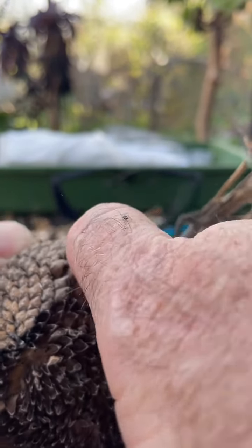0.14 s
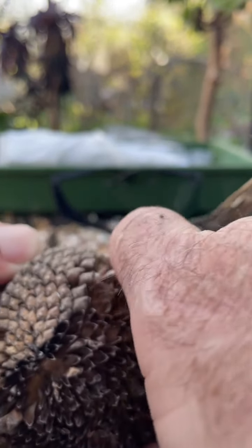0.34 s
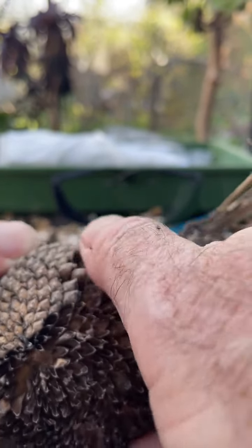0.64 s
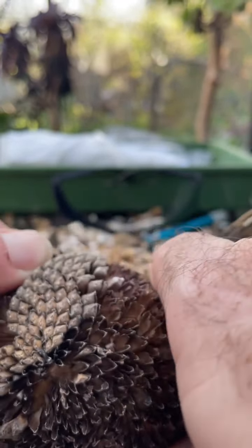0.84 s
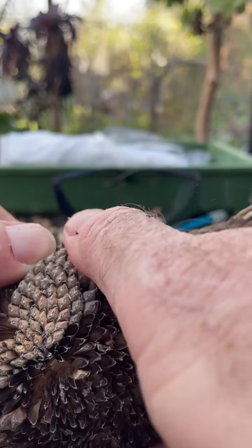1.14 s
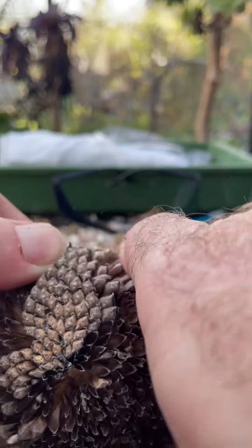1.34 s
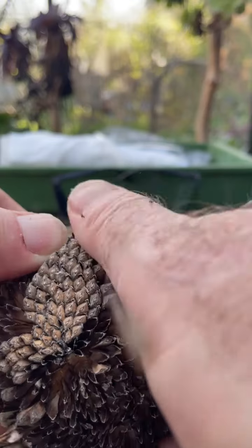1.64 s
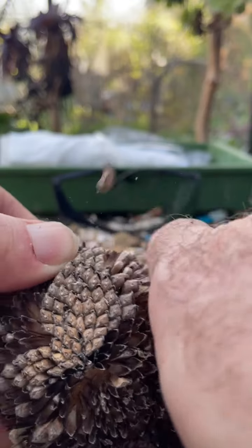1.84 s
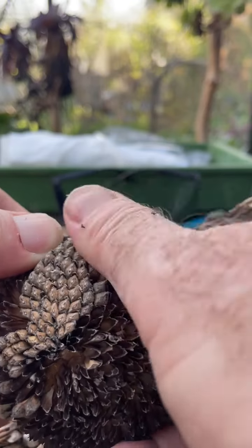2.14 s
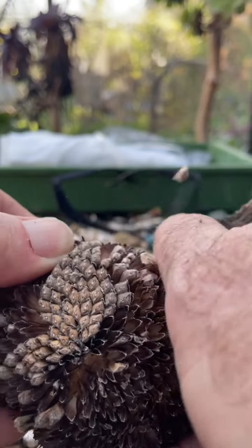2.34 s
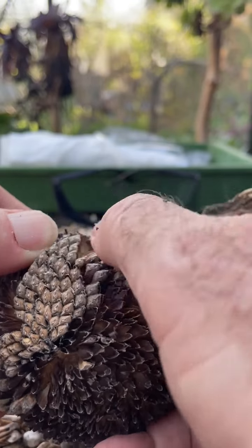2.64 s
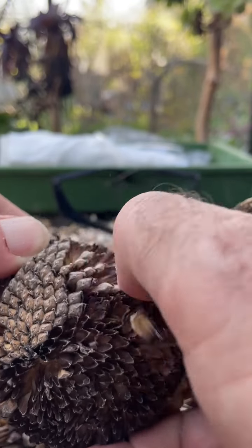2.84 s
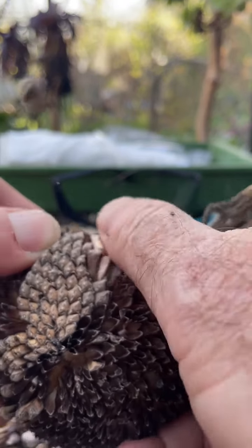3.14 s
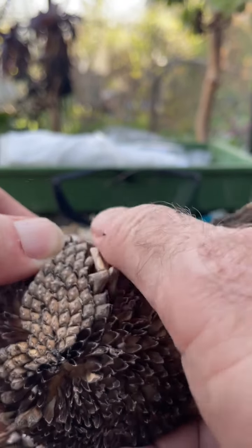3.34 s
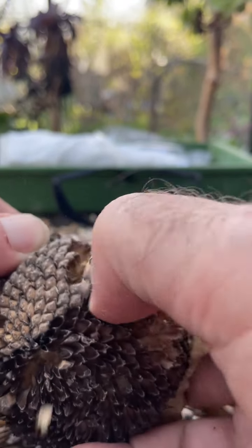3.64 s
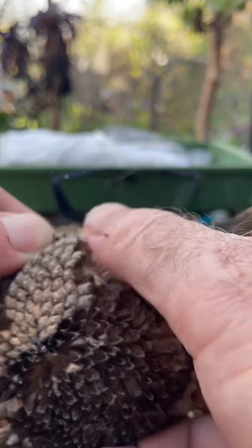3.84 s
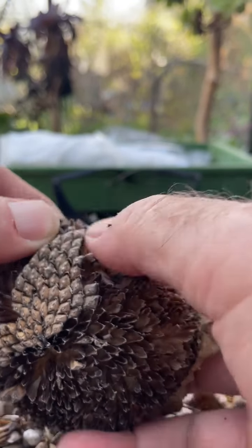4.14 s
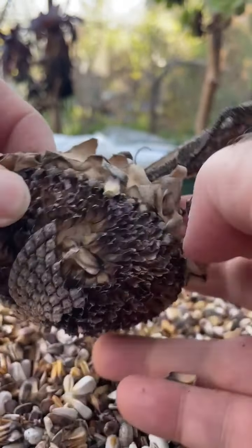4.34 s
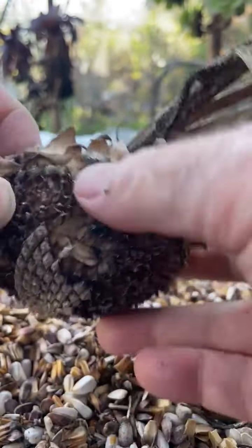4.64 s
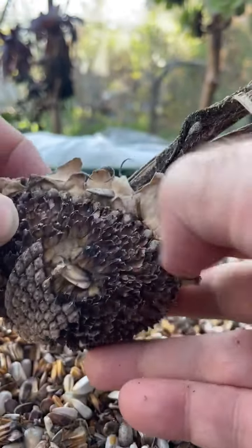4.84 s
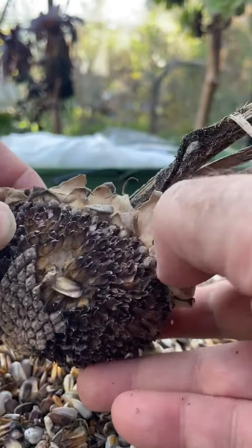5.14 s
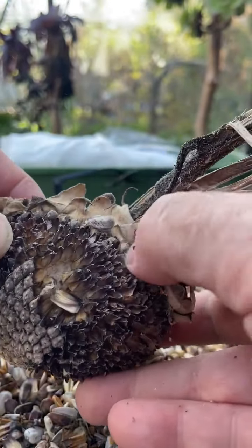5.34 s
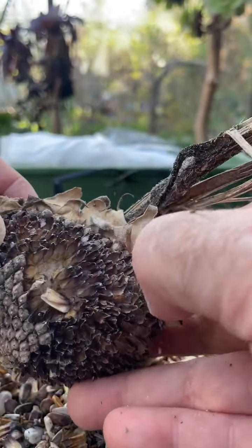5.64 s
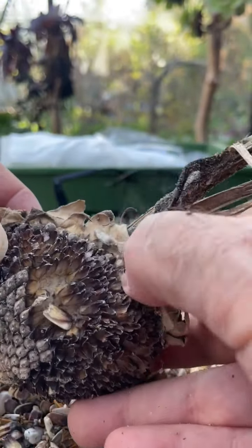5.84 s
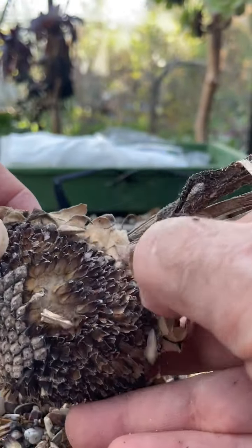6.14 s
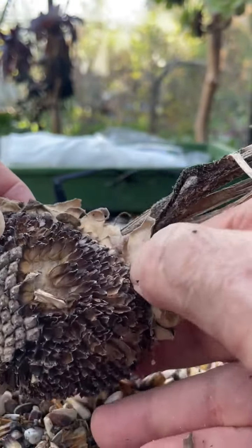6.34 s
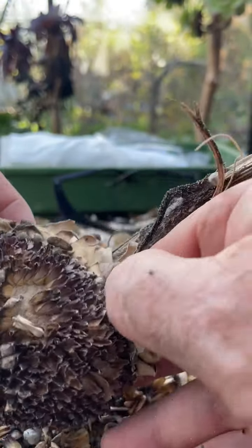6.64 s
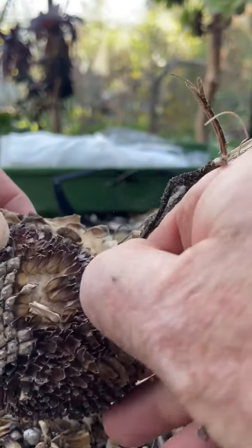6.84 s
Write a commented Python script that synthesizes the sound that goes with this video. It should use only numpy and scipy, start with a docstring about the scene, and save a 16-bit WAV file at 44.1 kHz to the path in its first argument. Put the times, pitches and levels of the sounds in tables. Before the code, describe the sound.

Dry husks crackle, creak and tick under short thumb pushes, with brief lulls between. Early strokes are light; later ones bring hard bright snaps and low thumps as the head knocks in the hand. Heard a hand's width away in stereo, dry and without echo, in a garden with faint low traffic and barely audible wavering hums.

```python
"""Seeds rubbed out of a dry flower head

A thumb rubs dry seeds out of a flower head, a hand's width from a phone in a garden.
Every push is a swarm of tiny fractures that ring the head, the husks and the chaff as damped modes.
Short noise bursts make the snaps and one squeak; the head knocks in the hand as falling sine thumps.
Behind, far traffic rumbles as filtered noise and faint wavering sine hums come and go."""
import sys
import numpy as np
from scipy import signal
from scipy.fft import rfft, irfft, next_fast_len
from scipy.io import wavfile
from scipy.ndimage import uniform_filter1d

SR = 44100
rng = np.random.default_rng(int(sys.argv[2]) if len(sys.argv) > 2 else 0)


def generate_wav(signal):
    """Clip the signal to [-1, 1] and save it as 16-bit WAV at the path in sys.argv[1]."""
    frames = np.transpose(np.atleast_2d(signal))
    scaled = np.clip(frames, -1, 1) * 32767
    pcm = np.round(scaled).astype(np.int16)
    wavfile.write(sys.argv[1], SR, pcm)


N = 308259
PORT_SIGN = np.array([[1], [-1]])  # left, right


def undb(db):
    """Gain of a dB value."""
    return 10 ** (np.asarray(db) / 20)


def unit(x):
    """Scale to rms 1."""
    return x / np.sqrt(np.mean(x ** 2))


def walk(rate_hz):
    """Random levels, one per 1 / rate_hz, joined by ramps; rms 1."""
    hold = int(SR / rate_hz)
    steps = np.repeat(rng.standard_normal(N // hold + 1), hold)
    return unit(uniform_filter1d(steps, hold)[:N])


def ring(x, hz, width_hz):
    """One damped mode, gain 1 at its centre."""
    return signal.lfilter(*signal.iirpeak(hz, hz / width_hz, fs=SR), x)


def ring_twice(x, hz, width_hz):
    """A mode with steeper skirts: a second resonance, twice as wide, follows the first."""
    return ring(ring(x, hz, width_hz), hz, 2 * width_hz)


def colour(x, response):
    """Filter by a function of frequency."""
    size = next_fast_len(N)
    hz = np.arange(size // 2 + 1) * SR / size + 1  # 1 Hz up keeps its log finite
    return irfft(rfft(x, size) * response(hz), size)[..., :N]


def pressure():
    """Husk, head and chaff levels in dB: every push swells, holds and lets go over a quiet rest."""
    # thumb pushes: (full pressure from [s], hold [s], swell [s], release [s],
    #                husk crackle [dB], head creak [dB], chaff rustle [dB])
    strokes = [(0.001, 0.074, 0.074, 0.1, -56.5, -60.5, -56.5), (0.181, 0.038, 0.009, 0.067, -43, -40, -46),
               (0.384, 0.075, 0.1, 0.17, -50, -59, -53.5), (0.676, 0.063, 0.13, 0.032, -43.5, -46.5, -48.5),
               (0.807, 0.056, 0.043, 0.053, -37, -45, -44.5),
               (1.035, 0.096, 0.087, 0.12, -56.5, -59.5, -68), (1.253, 0.047, 0.067, 0.084, -43, -40, -47),
               (1.431, 0.063, 0.09, 0.018, -44, -46, -48), (1.558, 0.008, 0.063, 0.037, -38, -53.5, -42),
               (1.703, 0.012, 0.1, 0.066, -43.5, -45, -50), (1.817, 0.014, 0.055, 0.071, -36.5, -39, -39.5),
               (1.869, 0.18, 0.046, 0.016, -49, -57.5, -57.5), (2.291, 0.021, 0.21, 0.024, -38, -42.5, -41),
               (2.361, 0.034, 0.031, 0.13, -39.5, -51, -45.5), (2.688, 0.025, 0.15, 0.23, -41, -47, -41.5),
               (2.902, 0.038, 0.15, 0.052, -37, -49, -46), (3.027, 0.086, 0.014, 0.15, -43.5, -47, -46.5),
               (3.086, 0.082, 0.023, 0.17, -43.5, -43.5, -46),
               (3.311, 0.014, 0.046, 0.076, -38, -46, -43.5),
               (3.397, 0.027, 0.027, 0.05, -34.5, -39.5, -40),
               (3.496, 0.045, 0.15, 0.031, -40.5, -42.5, -48), (3.61, 0.026, 0.082, 0.018, -37, -50.5, -42),
               (3.674, 0.022, 0.02, 0.13, -40.5, -49, -44), (3.801, 0.016, 0.01, 0.11, -32, -44.5, -39.5),
               (3.883, 0.03, 0.057, 0.022, -37.5, -49.5, -47), (4.049, 0.022, 0.15, 0.052, -58, -65, -62.5),
               (4.16, 0.1, 0.039, 0.02, -38, -42, -42.5), (4.312, 0.019, 0.13, 0.19, -37, -48, -42.5),
               (4.557, 0.017, 0.011, 0.21, -47.5, -57, -55),
               (4.723, 0.031, 0.14, 0.095, -35.5, -44.5, -40.5),
               (5.023, 0.049, 0.098, 0.026, -35, -44.5, -38.5),
               (5.121, 0.0073, 0.16, 0.21, -46.5, -53, -66), (5.357, 0.083, 0.16, 0.067, -44.5, -53.5, -45),
               (5.522, 0.016, 0.015, 0.09, -34.5, -39, -46), (5.653, 0.026, 0.035, 0.1, -49.5, -65, -61),
               (5.816, 0.042, 0.089, 0.1, -51, -51, -49), (5.885, 0.0076, 0.017, 0.051, -34.5, -44.5, -31),
               (6.015, 0.011, 0.031, 0.033, -37, -37.5, -44), (6.06, 0.0087, 0.069, 0.034, -33.5, -45, -45),
               (6.143, 0.092, 0.1, 0.15, -41, -46, -47.5), (6.483, 0.06, 0.2, 0.031, -46, -49.5, -50),
               (6.591, 0.025, 0.012, 0.15, -44, -46.5, -47), (6.688, 0.094, 0.048, 0.037, -54, -57, -52),
               (6.938, 0.0081, 0.16, 0.099, -47, -50.5, -56)]
    # while the hands only hold the head: (husk [dB], head [dB], chaff [dB])
    rest_levels = (-62.5, -65, -82)
    swell_db = 20  # rise over the swell time, fall over the release time
    t = np.arange(0, N + 64, 64) / SR
    start, hold, swell, release, *levels = np.transpose(strokes)[..., None]
    before = (start - t) / swell
    after = (t - start - hold) / release
    shape_db = -swell_db * np.maximum(np.maximum(before, after), 0)
    tracks = []
    for db, rest_db in zip(levels, rest_levels):
        power = np.sum(undb(db + shape_db) ** 2, axis=0) + undb(rest_db) ** 2
        tracks.append(np.interp(np.arange(N) / SR, t, 10 * np.log10(power)))
    return tracks


def fractures(effort_db, spread_db=1.5, patchy_db=1.5, pan_db=10, count=11000, busy_db=-43.5, sparse=.15):
    """Places and port gains of tiny fractures: flurries under a firm thumb, lone ticks under a light one."""
    tick_share, tick_db = .09, 11  # the few that stand out as dry ticks
    place, rank, pan, keep, tick = rng.random((count, 5)).T
    at = (place * (N - 1)).astype(int)
    share = np.clip(undb(effort_db[at] - busy_db), sparse, 1)
    kept = (keep < share) / np.sqrt(share)  # fewer but larger
    patches = (walk(22) + walk(60))[at]
    size = kept * undb(-spread_db * np.log(1 - .97 * rank) + patchy_db * patches)
    size *= rng.standard_normal(count) + np.where(tick < tick_share, undb(tick_db), 0)
    side_db = pan_db * (2 * pan - 1)
    return at, size * undb(PORT_SIGN * side_db / 2)


def rubbing(modes, level_db, at, size, tone_hz=None, colour_db=3.5, scatter=.45, smear=.5, shift_db=2.5):
    """Fractures drive each mode by varied amounts; steady noise fills the gaps; the grip shifts the colour."""
    focus_db = 7  # fall per octave away from tone_hz
    lean = np.ones((len(modes), 1))
    if tone_hz is not None:
        lean = undb(-focus_db * np.abs(np.log2(np.array(modes)[:, :1] / tone_hz)))
        lean = lean / np.sqrt(np.mean(lean ** 2, axis=0))
    out = 0
    for k, ((hz, width_hz, db), weight) in enumerate(zip(modes, lean)):
        push = (-1) ** k + scatter * rng.standard_normal((2, len(at)))
        push = push * undb(colour_db * rng.standard_normal(len(at)))
        pulses = np.zeros((2, N))
        for channel in range(2):
            np.add.at(pulses[channel], at, size[channel] * push[channel])
        shared, *own = rng.standard_normal((3, N))
        bed = shared + scatter * np.array(own)
        drive = unit(pulses) + smear * bed
        out = out + weight * undb(db + shift_db * walk(22)) * ring_twice(drive, hz, width_hz)
    return unit(out) * undb(level_db)


def snaps(modes, part, colour_db=1.5, tail_db=-22, tail_ms=6, scatter=.45, spiky_db=2.5):
    """A short noise burst with a rounded onset, with a weak noise tail after it, rings one part."""
    # short snaps, and one squeak near 970 Hz at 3.514 s:
    # (time [s], husk peak [dB], head peak [dB], chaff peak [dB], burst length [ms], pitch [Hz])
    bursts = [(0.0637, -31.5, -41.5, -37, 0.94, 5160), (0.1442, -32, -58, -37, 0.8, 3340),
              (0.196, -26.5, -33, -28, 3, 1260), (0.2192, -42, -30, -43, 1.0, 990),
              (0.236, -45, -28, -45.5, 2, 1020), (0.25, -50, -29.5, -48, 0.6, 1100),
              (0.2953, -34, -46, -51, 0.78, 4220), (0.3237, -32, -55, -37, 1.1, 6500),
              (0.421, -23.5, -54, -35, 0.52, 5840), (0.675, -27, -29, -26.5, 6.5, 855),
              (0.7289, -21, -33, -22, 1.7, 5940), (0.8182, -21.5, -27, -36, 1.9, 6000),
              (0.907, -27, -51, -36, 1.33, 2420), (0.9895, -35.5, -50, -38, 1.3, 6120),
              (1.0732, -34.5, -51.5, -33.5, 2.1, 3470), (1.1089, -35.5, -39, -36, 2.5, 730),
              (1.1875, -30, -42, -26.5, 0.74, 6780), (1.3096, -26, -37, -30, 2.3, 820),
              (1.3456, -23.5, -28.5, -28, 0.76, 2650), (1.419, -37, -27, -23, 0.89, 1740),
              (1.4489, -21.5, -25.5, -17.5, 1.2, 2750), (1.5696, -24.5, -39, -20, 1.2, 3550),
              (1.7081, -23.5, -27.5, -33, 1.6, 5970), (1.8219, -17.5, -30, -18, 0.77, 3320),
              (1.8459, -30, -25.5, -35, 1.5, 840), (1.9764, -25, -54, -37.5, 0.79, 2700),
              (2.0799, -32.5, -54.0, -30, 0.87, 3970), (2.2095, -28, -36, -19, 0.75, 2540),
              (2.2872, -21.5, -28, -19, 0.56, 780), (2.3791, -20, -34.5, -19.5, 1.33, 2780),
              (2.4823, -26, -37.5, -33.5, 1.5, 2730), (2.7364, -19.5, -37, -18, 1.7, 4100),
              (2.7606, -24, -52, -20, 0.74, 5830), (2.78, -16.5, -30, -29, 0.78, 3000),
              (2.8085, -26, -37, -16.5, 0.66, 6740), (2.9134, -18.5, -37, -27, 0.51, 5800),
              (2.9358, -17, -38, -27, 0.8, 2480), (3.0434, -18.5, -24.5, -8, 0.66, 740),
              (3.175, -23.5, -30.0, -22.5, 1, 830), (3.2055, -28, -46, -23, 0.75, 5710),
              (3.262, -7.5, -31, -32, 0.69, 3570), (3.393, -21, -26, -18, 1.52, 4100),
              (3.4217, -28, -31, -14.5, 0.48, 1840), (3.4462, -22, -47, -16.5, 1.35, 5940),
              (3.458, -19, -31, -9, 0.54, 6000), (3.467, -22.5, -27, -27, 0.6, 2500),
              (3.473, -36, -30, -40, 0.6, 590), (3.4917, -34, -28, -36, 0.6, 820),
              (3.5, -25, -35, -33, 0.8, 2600), (3.5075, -30, -41, -34, 0.6, 1200),
              (3.514, -44, -31, -50, 12, 970), (3.619, -17, -31.5, -23, 0.94, 2580),
              (3.6942, -17.5, -54, -25, 0.67, 6860), (3.784, -18.5, -32, -17, 1.5, 4390),
              (3.8, -10.5, -27.5, -15.5, 5, 4130), (3.8799, -16.5, -28, -24, 0.9, 4390),
              (3.9066, -23.5, -33, -21.5, 1.6, 3050), (4.0453, -31, -49, -39, 1.7, 2830),
              (4.0592, -29.5, -53, -39, 3, 2900), (4.13, -27.5, -35, -37, 0.63, 2700),
              (4.1525, -27, -52, -25, 1.6, 4200), (4.2, -26, -25.5, -21, 1.6, 1050),
              (4.253, -33, -27.5, -38, 1, 750), (4.3072, -26, -52, -20.5, 1.1, 4240),
              (4.33, -20, -30.5, -20, 0.7, 2880), (4.5148, -30.5, -57, -25, 1.2, 4630),
              (4.586, -28.5, -38.5, -50, 0.72, 3430), (4.718, -18.5, -40, -16, 4.3, 6000),
              (4.7352, -21.5, -49, -6.5, 0.51, 2480), (4.7628, -15.5, -25.5, -20, 1.4, 2950),
              (4.939, -26, -39, -27, 1.8, 6700), (4.99, -33, -53, -19, 1.7, 3700),
              (5.011, -23, -47, -5, 0.24, 4200), (5.069, -12.5, -20, -12.5, 1.55, 1360),
              (5.0866, -20, -33, -17, 0.83, 3120), (5.1306, -17, -32, -24, 0.55, 2750),
              (5.1365, -19, -22.5, -23, 2, 2870), (5.1897, -29.5, -50, -38, 1.2, 4100),
              (5.297, -31.0, -37, -39, 0.61, 2170), (5.331, -23, -38.5, -18.5, 1, 4140),
              (5.357, -23, -38, -20, 1.7, 4160), (5.3745, -22, -42, -13, 0.7, 5840),
              (5.4077, -16, -52, -13.5, 0.49, 6780), (5.4938, -28.5, -38, -31, 2.1, 3440),
              (5.5295, -9, -16.5, -9, 2, 4180), (5.549, -22, -41, -20, 1.3, 3560),
              (5.5681, -16, -19.5, -12.5, 0.85, 586), (5.6531, -13, -43, -20, 2.7, 5930),
              (5.8001, -30.5, -32, -46, 1.5, 4100), (5.8767, -17, -43, -17.5, 0.84, 6780),
              (5.8996, -17, -43, -11, 0.83, 6800), (5.986, -24, -48, -30, 0.96, 6800),
              (6.0102, -17, -29, -16, 0.68, 4890), (6.0171, -3.5, -16.5, -17.5, 2.6, 4930),
              (6.0576, -15.5, -39, -25, 1.2, 5040), (6.1443, -18.5, -44, -29, 0.81, 5070),
              (6.2012, -16, -30, -29, 1.7, 6700), (6.4301, -30, -39, -32.5, 0.77, 4220),
              (6.4773, -18.5, -23, -19, 1, 1410), (6.4964, -45, -26.5, -44, 0.6, 1570),
              (6.509, -40, -32, -38, 0.6, 1500), (6.5812, -40, -25, -44, 0.6, 1630),
              (6.5946, -26, -28, -32, 1.2, 5570), (6.6308, -30, -53, -27, 0.7, 5570),
              (6.804, -29.5, -54, -33, 1.4, 4950), (6.874, -29.5, -35, -24.5, 1.8, 830),
              (6.9123, -30, -50, -17, 0.58, 6050), (6.9196, -15.5, -17.5, -16, 3.1, 824)]
    focus_db = 5  # fall per octave away from the pitch of the burst
    own_db, own_q = 6, 5  # extra ring at that pitch: level, pitch over width
    head_top_hz = 2000  # lower bursts get it in the head, higher ones in the husks
    left_db = 1.8  # left over right
    ms = np.arange(1536) / SR * 1000
    mode_hz, _, mode_db = np.transpose(modes)
    out = np.zeros((2, N + len(ms)))
    for s, husk_db, head_db, chaff_db, length_ms, pitch_hz in bursts:
        peak_db = {"husk": husk_db, "head": head_db, "chaff": chaff_db}[part]
        grown = ms / (0.77 * max(length_ms, .3))
        pulse = (grown * np.exp(1 - grown)) ** 2
        tail = undb(tail_db) * (1 - np.exp(-grown)) * np.exp(-ms / tail_ms)
        spikes = undb(spiky_db * np.repeat(rng.standard_normal(64), len(ms) // 64))  # uneven level
        shared, *own = rng.standard_normal((3, len(ms)))
        burst = (pulse + tail) * spikes * (shared + scatter * np.array(own))
        octaves = np.abs(np.log2(mode_hz / pitch_hz))
        tint = undb(mode_db + colour_db * rng.standard_normal(len(modes)) - focus_db * octaves)
        rung = 0
        for k, (gain, (hz, width_hz, _)) in enumerate(zip(tint, modes)):
            rung = rung + gain * (-1) ** k * ring_twice(burst, hz, width_hz)
        if part == ("head" if pitch_hz < head_top_hz else "husk"):
            rung = rung + undb(own_db) * ring(burst, pitch_hz, pitch_hz / own_q)
        rung = rung / np.abs(rung).max(axis=1, keepdims=True)
        at = int(s * SR)
        out[:, at:at + len(ms)] += rung * undb(peak_db + PORT_SIGN * left_db / 2)
    return out[:, :N]


def knocks(drop=3.1, drop_ms=1.83):
    """Dull thumps whose pitch falls as the flesh gives way, each with the hollow ring of the head."""
    # head knocking in the hand: (time [s], nominal level [dB], final pitch [Hz], t60 [ms], at least 5)
    thumps = [(0.808, -33, 125, 130), (1.043, -40, 150, 70), (1.855, -36, 73.4, 200),
              (3.041, -35.5, 153, 140), (3.262, -23, 311, 43), (3.4607, -27.5, 129, 77),
              (3.476, -31.5, 79.4, 72), (4.203, -36, 196, 110), (4.668, -30.5, 119, 23),
              (5.067, -30.5, 134, 65), (5.531, -19.5, 347, 25), (5.57, -28, 84, 130),
              (6.0231, -21, 102, 90), (6.476, -35, 250, 45), (6.923, -14.5, 108, 60)]
    rise_ms = 1.56
    body_hz, body_db, body_t60_ms = 550, 0.5, 12.6  # hollow ring, level against the thump
    ms = np.arange(8192) / SR * 1000
    out = np.zeros(N + len(ms))
    for s, db, hz, t60_ms in thumps:
        turns = hz / 1000 * (ms + drop * drop_ms * (1 - np.exp(-ms / drop_ms)))
        thump = undb(db - 60 * ms / max(t60_ms, 5)) * (1 - np.exp(-ms / rise_ms)) * np.sin(2 * np.pi * turns)
        body = undb(db + body_db - 60 * ms / body_t60_ms) * np.sin(2 * np.pi * body_hz * ms / 1000)
        at = int(s * SR)
        out[at:at + len(ms)] += thump + body
    return out[:N]


def traffic_rumble(width=0.3, level_db=-50.5):
    """Far traffic: filtered noise that swells and flickers, nearly alike at both ports."""
    # rumble spectrum: (frequency [Hz], relative density [dB])
    spectrum = [(19, -60), (36, -5.5), (76, 2.5), (204, -9.5), (284, -9), (427, -21.5), (617, -19.5),
                (694, -33), (1510, -31), (2600, -27), (3380, -33), (5720, -120)]
    hz, db = np.transpose(spectrum)
    noise = rng.standard_normal((2, N))
    mid, side = colour(noise, lambda f: undb(np.interp(np.log(f), np.log(hz), db)))
    flicker_db = 1.5 * walk(12) + 2.2 * walk(3)
    return unit(mid + width * side * PORT_SIGN) * undb(level_db + flicker_db)


def hums():
    """Faint sines, wavering in pitch and level, that fade in and out."""
    # hums: (mean pitch [Hz], middle level [dB rms], full from [s], full until [s])
    tones = [(164.7, -62, 1, 1.75), (275, -64.5, 1.5, 3.3), (274.5, -62.5, 5.5, 6.7), (77, -58.5, -1, 5.4)]
    fade_s, pitch_waver = 0.049, 0.00578  # waver as rms share of pitch
    t = np.arange(N) / SR
    out = np.zeros(N)
    for hz, db, on, off in tones:
        level = np.sqrt(2) * undb(db + 1.5 * walk(3.99))
        fade = np.clip(np.minimum(t - on, off - t) / fade_s + 1, 0, 1)
        turns = np.cumsum(hz * (1 + pitch_waver * walk(2.4))) / SR
        out += level * fade * np.sin(2 * np.pi * turns)
    return out


def scene():
    """Flower head and garden, left and right."""
    # damped modes of each part: (centre [Hz], width of the first resonance [Hz], relative level [dB])
    husk = [(2814, 740, 6), (3856, 970, 1.5), (4694, 1450, 2), (6335, 670, 7), (7360, 5200, -8.5)]
    head = [(259, 40, 5), (467, 640, 4), (703, 255, 4), (938, 307, -0.5), (1275, 530, -2), (1794, 480, 1.5)]
    chaff = [(8300, 2000, -3.5), (10350, 1310, -0.5), (11460, 2640, -3.5), (14730, 270, -4)]
    # where the head's creak is strongest as the grip changes: (time [s], tone [Hz])
    creak_tone = [(.2, 1150), (.45, 1660), (.7, 1040), (.85, 1340), (1.07, 610), (1.28, 1400), (1.83, 1290),
                  (2.3, 980), (3.13, 1170), (3.47, 634), (3.515, 880), (3.64, 1380), (4.2, 830), (4.7, 657),
                  (5.05, 1030), (5.55, 830), (6.2, 970), (6.6, 1330), (6.95, 680)]
    husk_db, head_db, chaff_db = pressure()
    at, size = fractures(husk_db)
    tone_hz = np.interp(np.arange(N) / SR, *np.transpose(creak_tone))
    flower = rubbing(husk, husk_db, at, size) + snaps(husk, "husk")
    flower += rubbing(head, head_db, at, size, tone_hz) + snaps(head, "head")
    flower += rubbing(chaff, chaff_db, at, size) + snaps(chaff, "chaff")
    return flower + knocks() + traffic_rumble() + hums()


def record(dry):
    """Two ports differ in phase and level by frequency; peaks are rounded, then the top is cut."""
    # phase lead of the left port over the right: (frequency [Hz], lead [rad])
    left_leads = [(0, .2), (780, .8), (1030, .5), (2000, .5), (2840, 1.5), (4000, 0), (5500, -.1),
                  (6630, -3.1), (8180, -3.3), (9820, -5.8), (12100, -6.7), (13400, -9.1), (17000, -9.6)]
    # level of the left port over the right: (frequency [Hz], step [dB])
    left_louder = [(60, 1.5), (110, -0.5), (200, 0), (380, -1.5), (700, 0.5), (1290, -1.5), (2380, 0.5),
                   (4400, 5), (8120, -0.5), (15000, -1)]
    top_hz, ceiling = 16500, .95
    lead_hz, lead_rad = np.transpose(left_leads)
    step_hz, step_db = np.transpose(left_louder)
    half = PORT_SIGN / 2

    def port_response(f):
        """Half the phase and level difference, opposite at the two ports."""
        phase = half * np.interp(f, lead_hz, lead_rad)
        gain = undb(half * np.interp(np.log(f), np.log(step_hz), step_db))
        return np.exp(1j * phase) * gain

    rounded = ceiling * np.tanh(colour(dry, port_response) / ceiling)
    return signal.sosfilt(signal.ellip(8, .2, 70, top_hz, fs=SR, output="sos"), rounded)


dry = scene()
out = record(dry)
generate_wav(out)
```